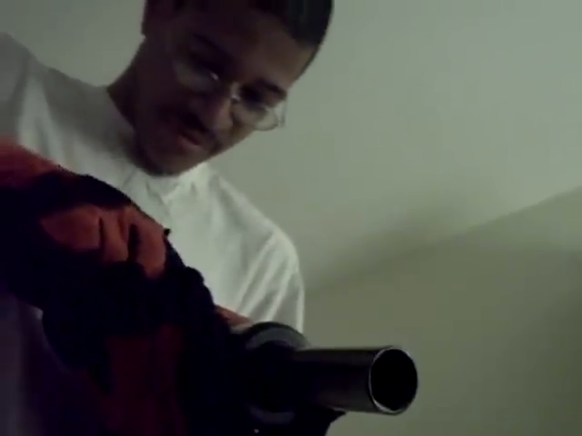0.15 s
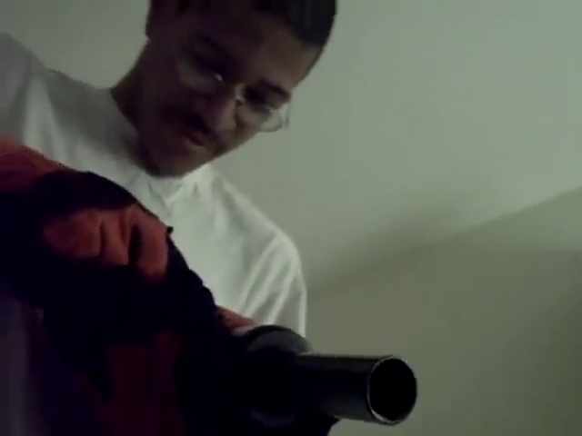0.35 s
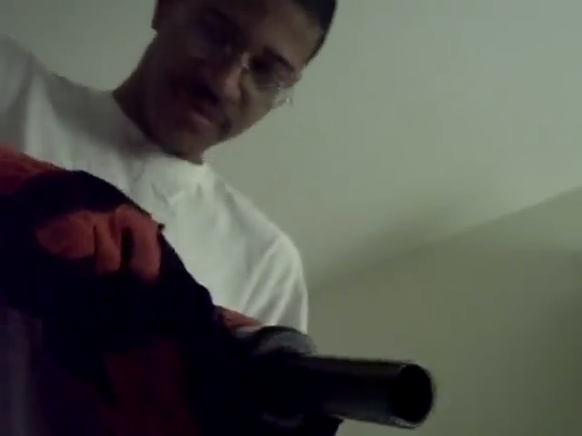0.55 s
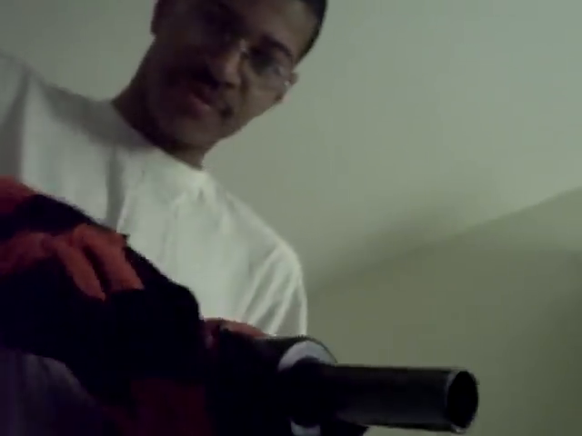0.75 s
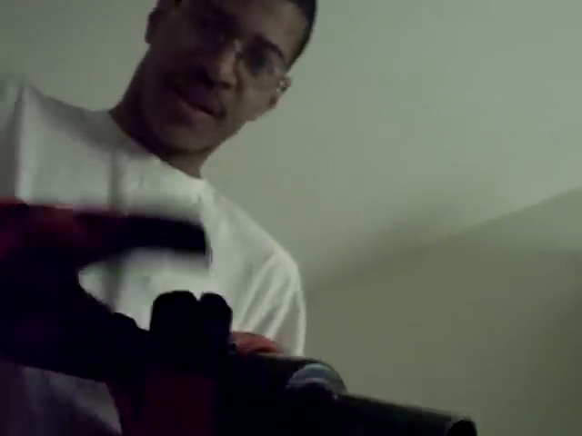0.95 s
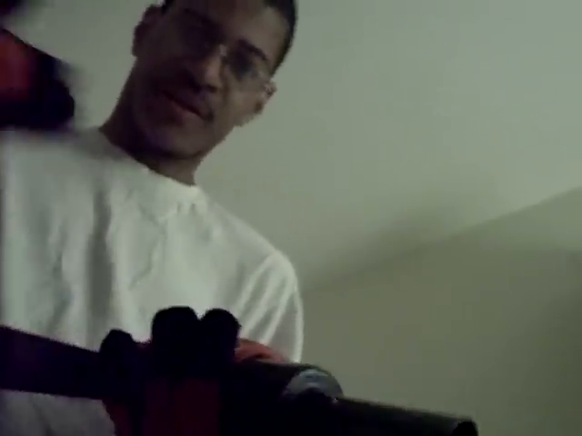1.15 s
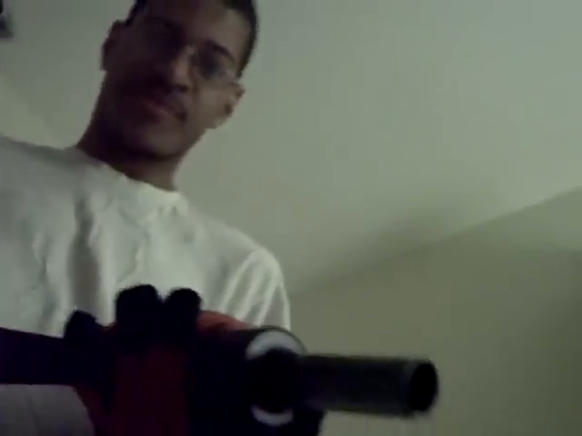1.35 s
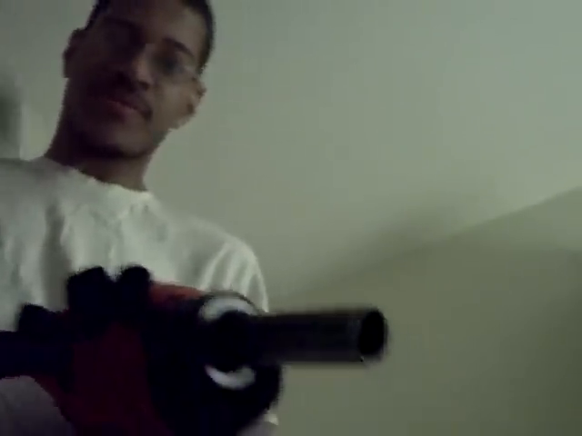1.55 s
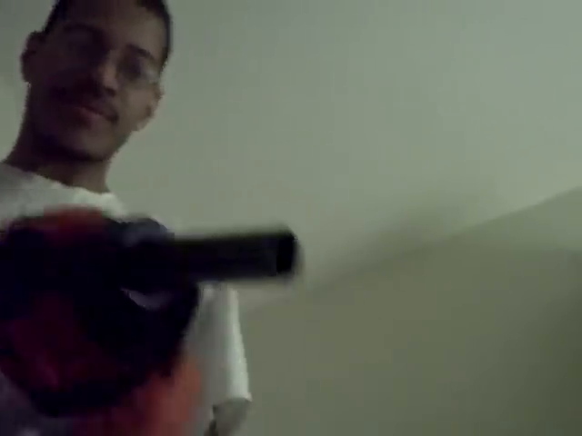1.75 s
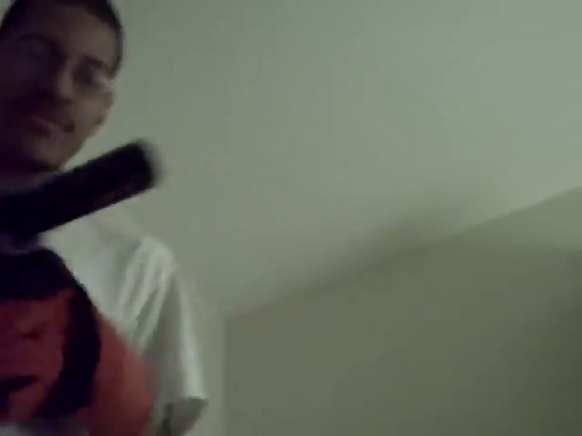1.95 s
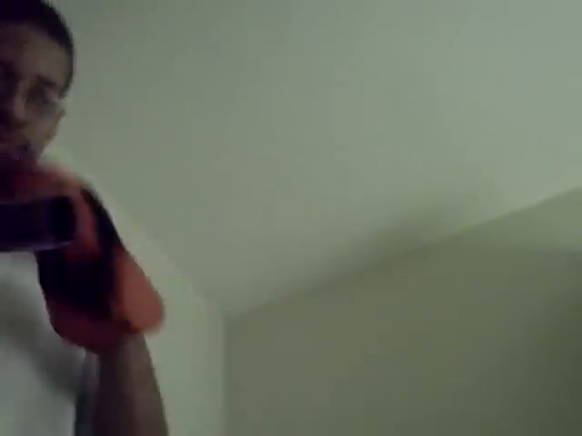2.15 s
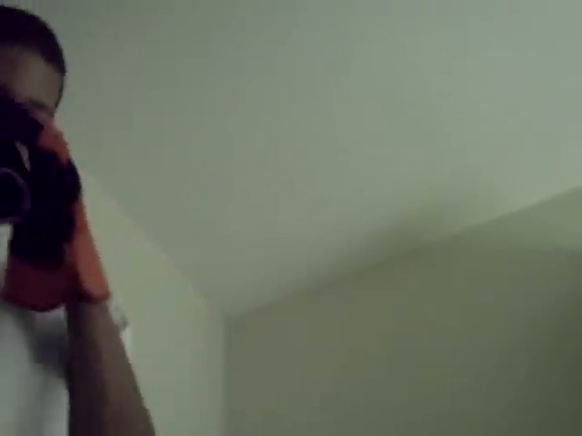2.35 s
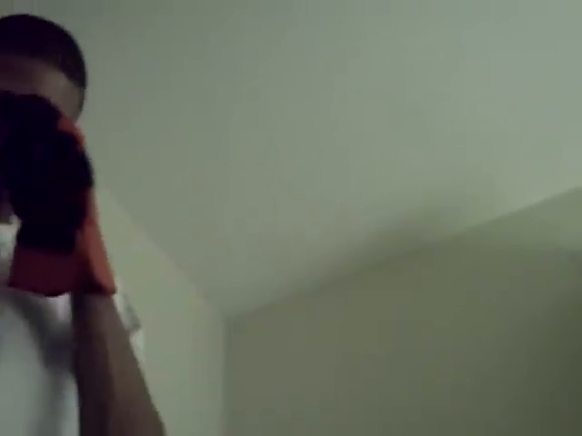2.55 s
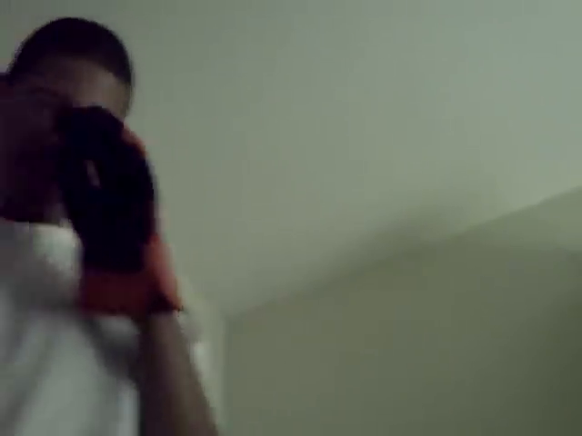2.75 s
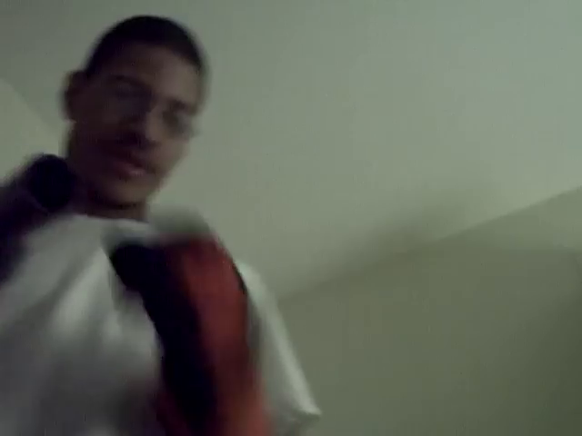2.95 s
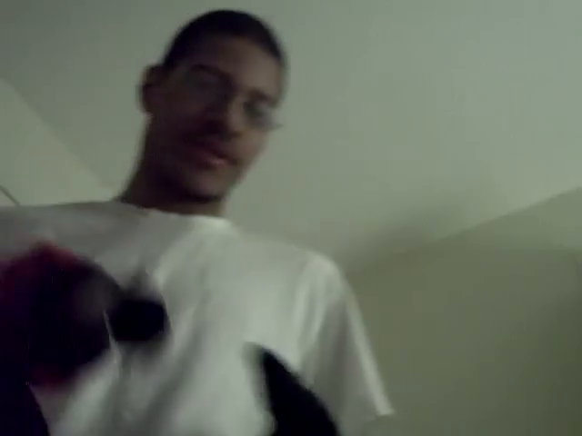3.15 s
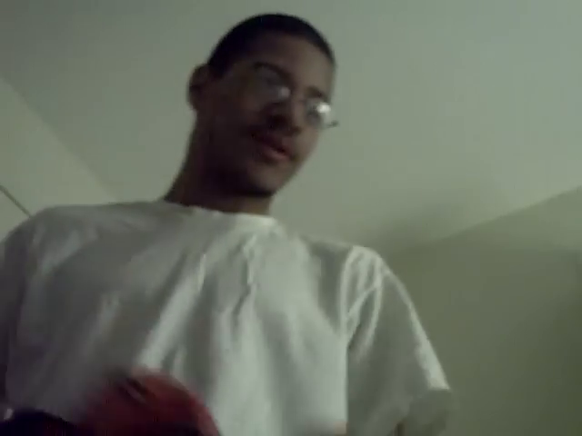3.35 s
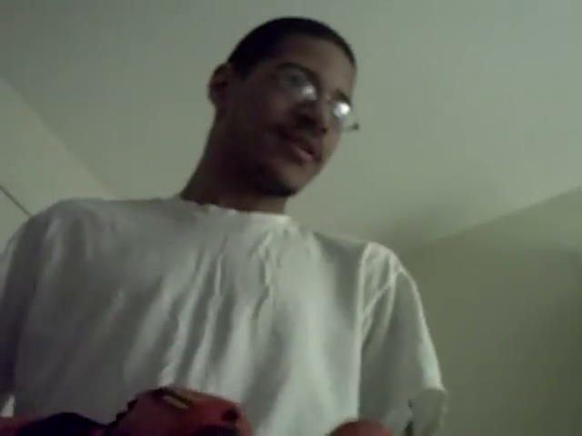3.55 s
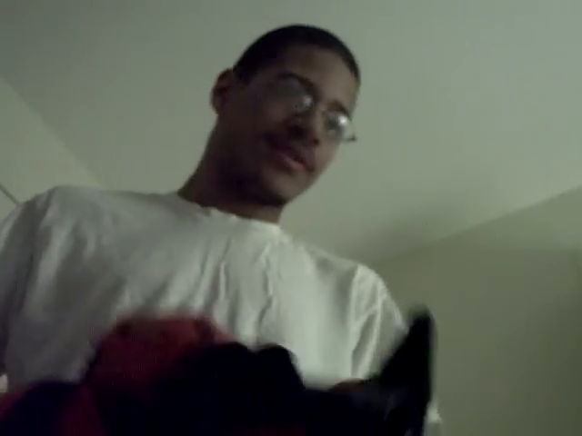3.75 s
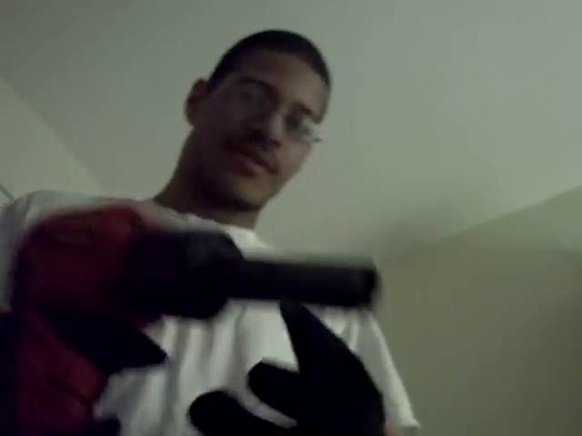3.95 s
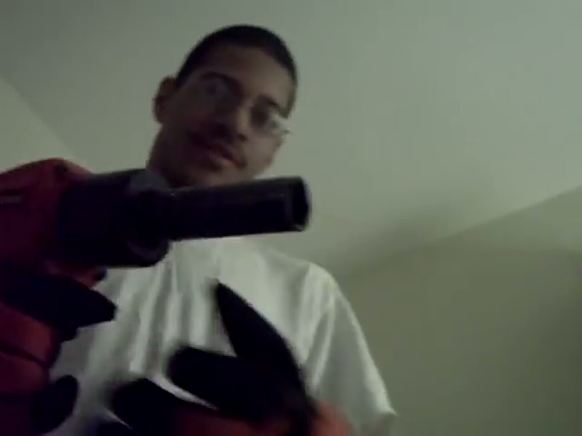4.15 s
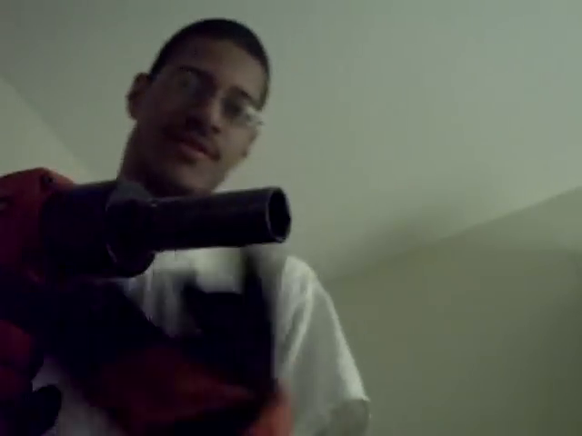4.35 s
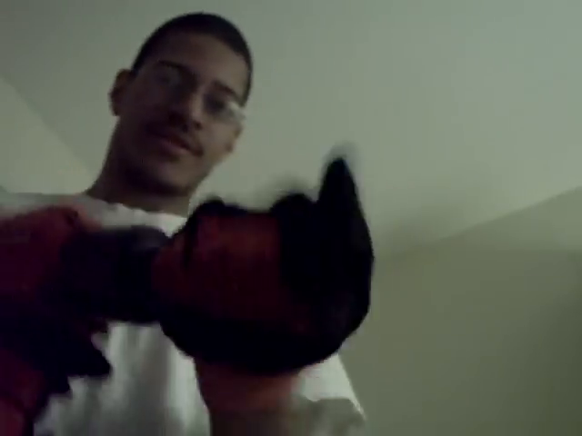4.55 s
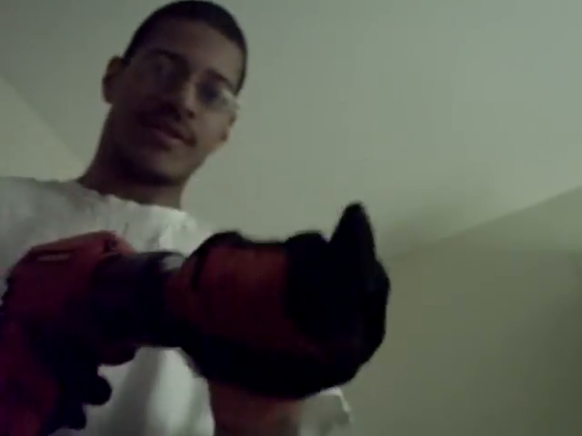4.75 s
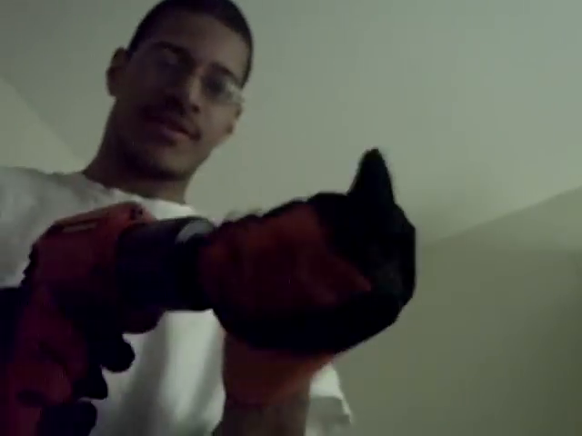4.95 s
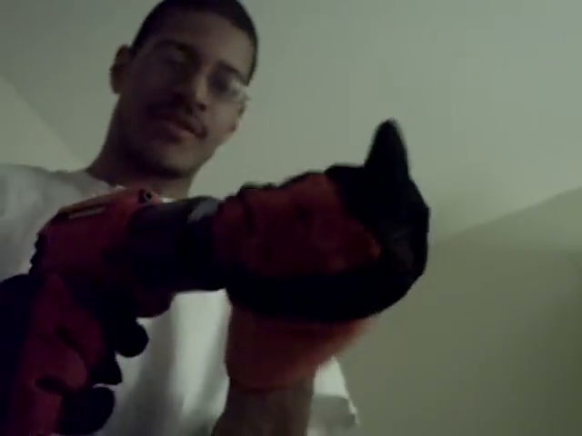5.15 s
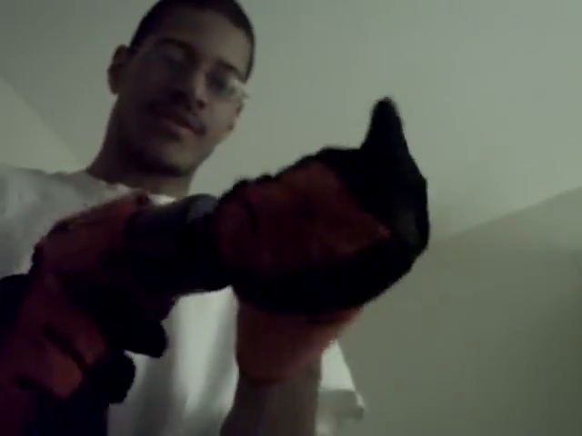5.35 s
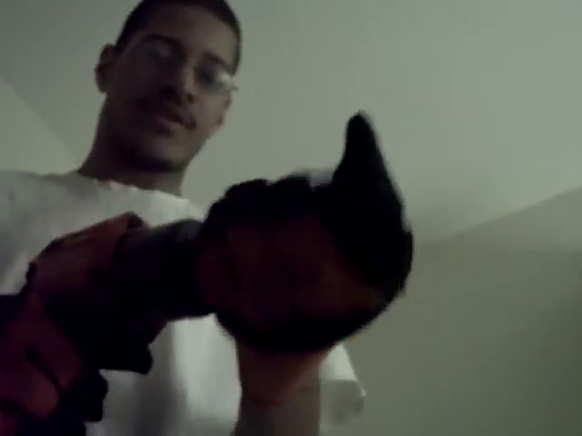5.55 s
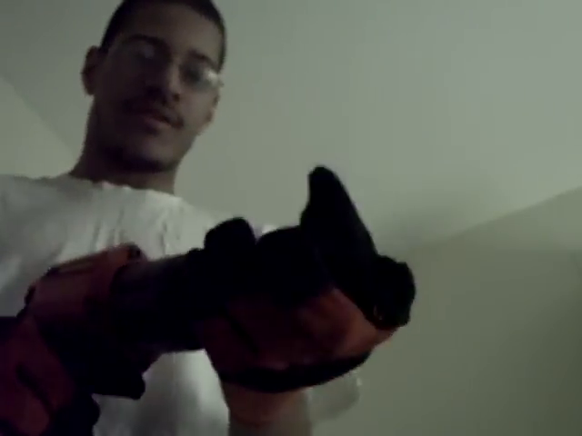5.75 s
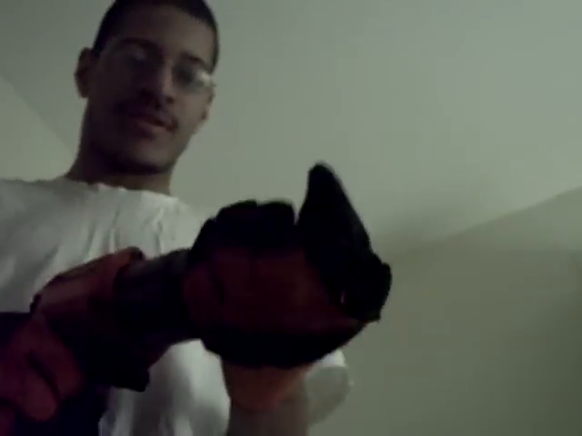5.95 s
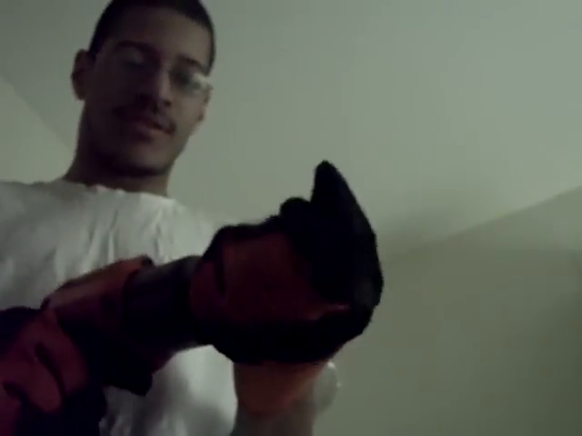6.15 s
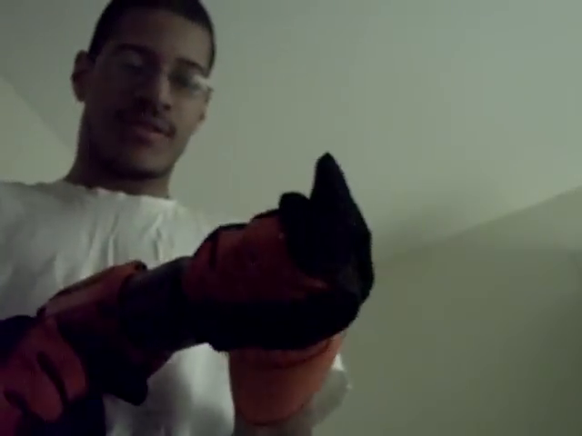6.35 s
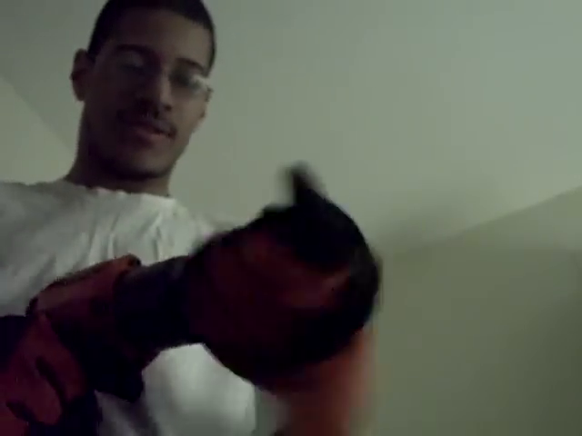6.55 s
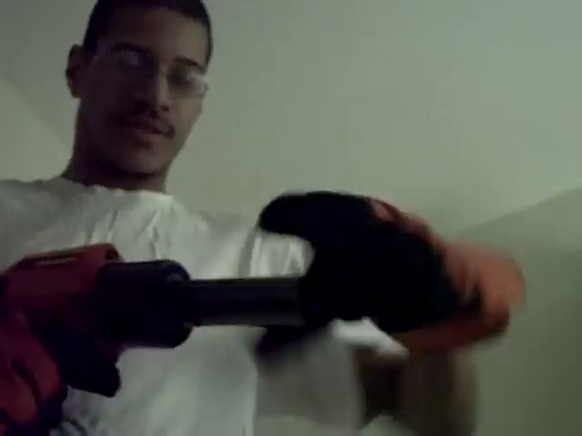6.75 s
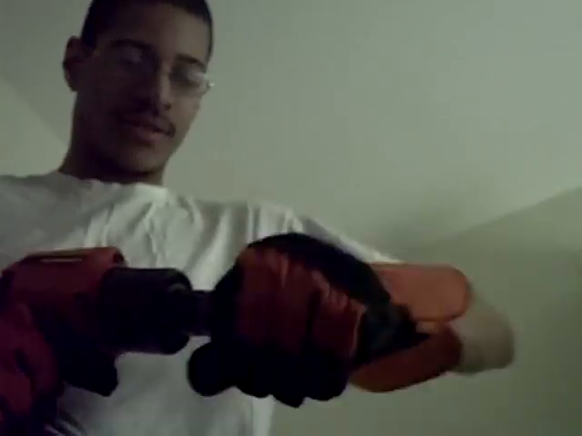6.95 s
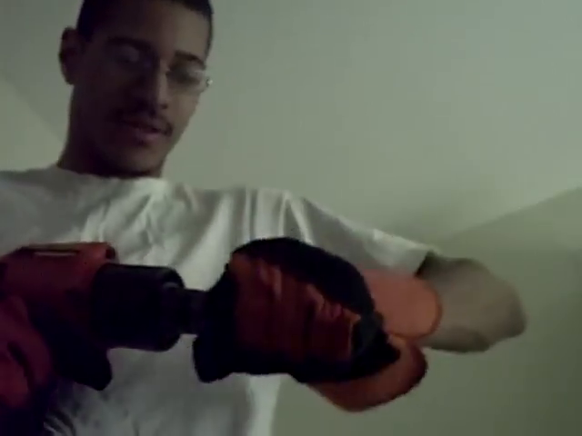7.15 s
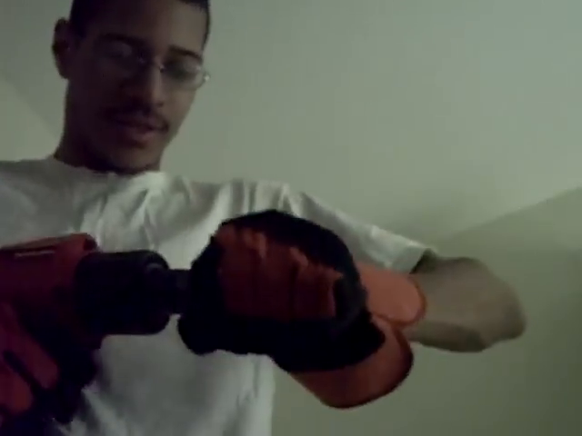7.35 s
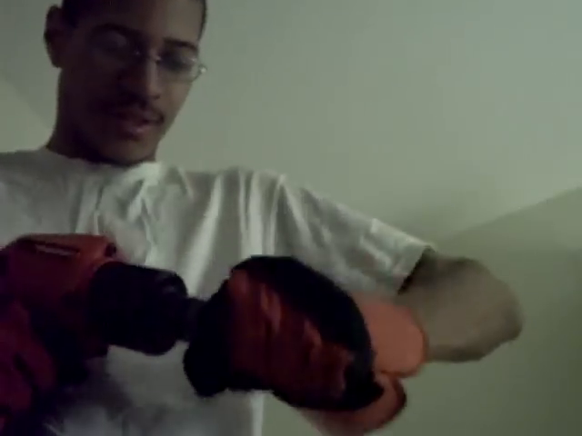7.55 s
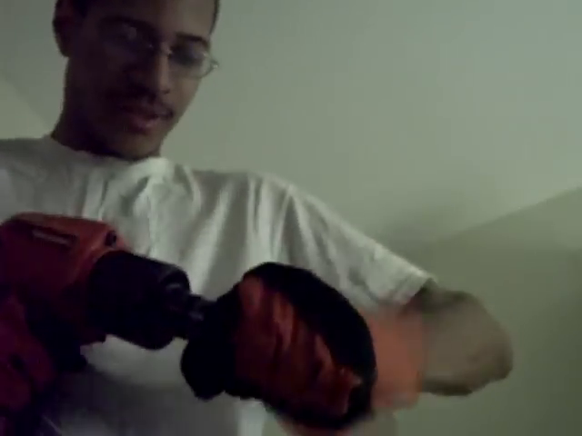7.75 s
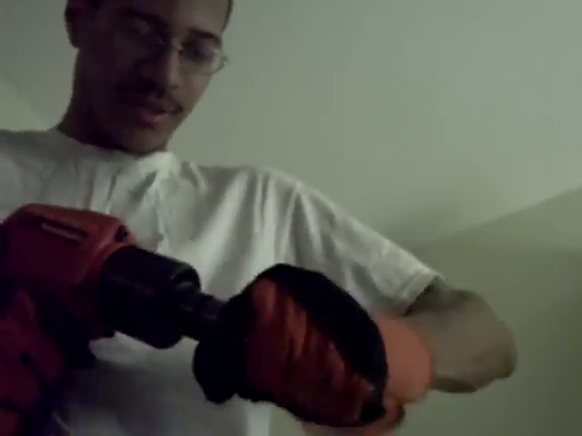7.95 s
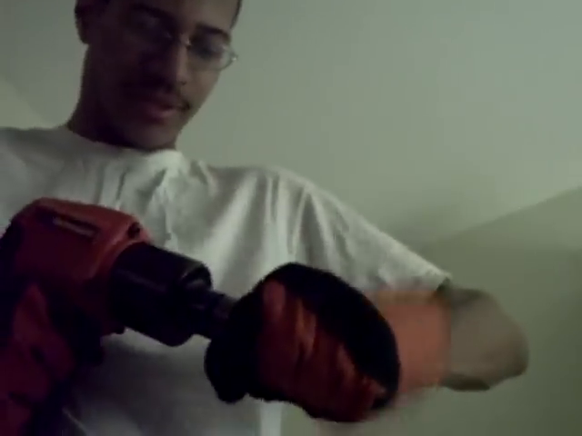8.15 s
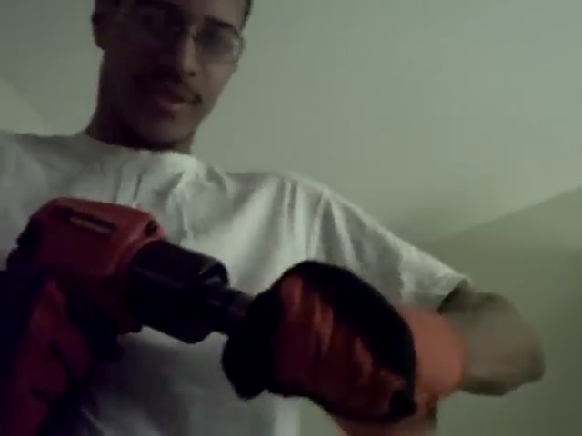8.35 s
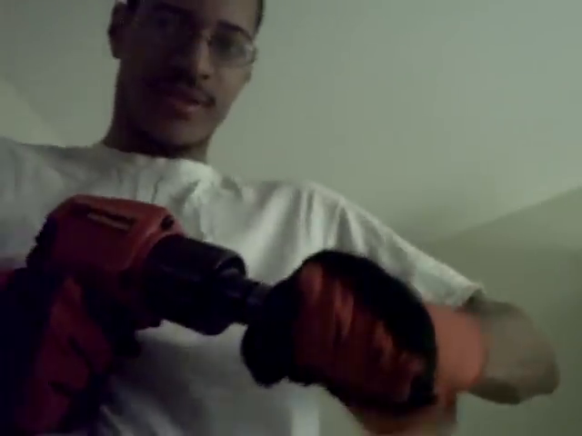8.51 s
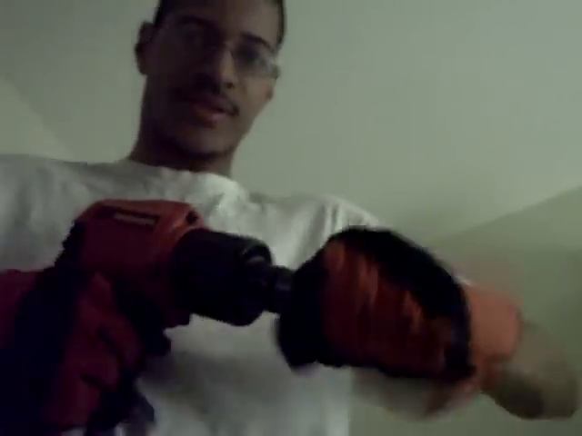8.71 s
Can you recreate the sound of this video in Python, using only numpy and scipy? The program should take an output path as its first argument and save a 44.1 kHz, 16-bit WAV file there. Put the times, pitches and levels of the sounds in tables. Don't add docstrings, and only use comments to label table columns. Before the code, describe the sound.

A steady compressor hum fills a bare room while an impact wrench close by hammers a short burst, pauses, then a longer one.

```python
import sys
import numpy as np
from scipy import signal
from scipy.fft import rfft, irfft
from scipy.io import wavfile
from scipy.ndimage import uniform_filter1d

SR = 44100
rng = np.random.default_rng(int(sys.argv[2]) if len(sys.argv) > 2 else 0)


def generate_wav(sig):
    pcm = np.round(np.clip(np.atleast_2d(sig).T, -1, 1) * 32767).astype(np.int16)
    wavfile.write(sys.argv[1], SR, pcm)


def gain_from_decibels(decibels):
    exponent = np.asarray(decibels, float) / 20
    return 10 ** exponent


N = 387191
PUMP_HZ = 56.378

# pressed t/s, let go t/s, hiss level/dB, grumble level/dB, shudder level/dB
TRIGGER_PULLS = [
    (4.793, 5.45, -30, -27, -22.5),
    (7.487, 8.9, -31, -15.5, -44),
]
# t/s, peak level/dB, housing clank level/dB
HAMMER_BLOWS = [(4.8519, -5.5, -10), (4.928, -8, -11), (4.9863, -10, -15), (5.0845, -7, -16),
                (5.1736, -10, -12.5), (5.2622, -14, -16), (5.353, -5, -18), (5.4477, -7, -15.5),
                (7.5429, 6, -6.5), (7.577, -5, -9), (7.6595, -3, -9), (7.742, -2.5, -12.5),
                (7.821, -4, -12), (7.8992, -9, -9.5), (7.979, -0.5, -5.5), (8.0596, 0.5, -8),
                (8.144, -9, -14), (8.227, -3, -10), (8.311, -4.5, -11), (8.395, -2, -12.5),
                (8.48, -2, -8.5), (8.5623, -3.5, -11), (8.643, 5, -10.5), (8.729, -3.5, -11.5)]
# t/s, peak level/dB, jolt of air level/dB
CAM_RELEASES = [(4.8219, -3, -6), (4.8988, -15, -25), (4.958, -9, -9), (5.0455, -6.5, -16),
                (5.141, -16, -25), (5.233, -16, -5), (5.3202, -4, 0.5), (5.3707, -14, -4),
                (5.4143, -15, -9), (7.522, -13, -23), (7.628, -8, -22), (7.7127, -10, -19),
                (7.793, -11, -11), (7.8709, -19, -8), (7.957, -14, -26), (8.0302, -18, -20),
                (8.114, -17, -22), (8.2055, -5.5, -13), (8.28, -14, -25), (8.37, -15, -25),
                (8.4494, -12.5, -25), (8.5334, -15, -3), (8.616, -11, -29), (8.7025, -20, -26)]


def level(x, db):
    return x * gain_from_decibels(db) / np.sqrt(np.mean(x ** 2))


def ring(x, modes):
    total = 0
    for k, (hz, width, db) in enumerate(modes):
        b, a = signal.iirpeak(hz, hz / width, SR)
        total = total + (-1) ** k * gain_from_decibels(db) * signal.lfilter(b, a, x)
    return total


def walk(rate):
    hold = int(SR / rate)
    steps = np.repeat(rng.standard_normal(N // hold + 1), hold)
    return 0.54 * uniform_filter1d(steps, hold)[:N]


def noise():
    return rng.standard_normal(N)


def bursts(times, gains, decay_s):
    kick = np.zeros(N)
    np.add.at(kick, (np.asarray(times) * SR).astype(int), gains)
    return signal.lfilter([1], [1, -np.exp(-1 / (decay_s * SR))], kick)


def swell(times, wide_s):
    kick = np.zeros(N)
    kick[np.minimum(np.asarray(times) * SR, N - 1).astype(int)] = 1
    return signal.fftconvolve(kick, np.hanning(int(wide_s * SR)), mode="same")


def exhaust(duty=0.32, fade_db=-48.0, scatter_db=3.0, quicken=1.2):
    # fastest puff t/s, its spacing/ms, vane passes since the stall, rebound level/dB
    spin_ups = [(4.8552, 4.46, 6.0, 0), (4.931, 4.4, 6.3, 0), (4.9856, 4.95, 6.2, 0), (5.084, 5.14, 5.8, 0),
                (5.1763, 4.87, 6.3, -8), (5.262, 5.11, 5.9, 0), (5.356, 5.32, 7.2, 0),
                (5.4375, 5.96, 5.1, -8), (7.5467, 4.59, 6.9, 0), (7.5792, 4.27, 9.0, 0),
                (7.6621, 4.71, 6.3, -8), (7.7468, 5.0, 7.4, -8), (7.8206, 4.75, 6.0, -8),
                (7.8983, 4.8, 5.4, 0), (7.9809, 4.78, 6.2, -8), (8.0646, 4.99, 7.2, -8),
                (8.142, 4.97, 6.2, -8), (8.2311, 5.09, 6.8, -8), (8.3096, 4.89, 5.8, 0),
                (8.3967, 5.19, 6.6, -8), (8.4843, 5.06, 7.0, -8), (8.5621, 4.88, 5.7, 0),
                (8.6409, 5.21, 5.3, -8), (8.7319, 4.59, 6.3, -8)]
    # f/Hz, width/Hz, level/dB
    muffler_modes = [(852, 400, -2.5), (1470, 1400, -10)]
    puff_db, loud_puffs = 4.5, 5
    rebound_ms, slower_ms_per_db = 6.7, .1
    puffs, gust = np.zeros(N + SR), np.zeros(N + SR)
    chance = rng.standard_normal((len(spin_ups), 12))
    for (end, gap, passes, back_db), luck in zip(spin_ups, chance):
        loud = min(loud_puffs, round(passes) - 1)
        back = rebound_ms - slower_ms_per_db * back_db
        j = np.arange(np.ceil(passes))
        speed = np.sqrt(1 - j / passes)
        times = end - 2 * passes * gap * (1 - speed) / 1000
        dbs = -8.0 * (j / passes) ** 2 + fade_db * (j > loud)
        coast = np.arange(1, 4)
        times = np.append(times, end + back / 1000 * np.cumsum(1.3 ** (coast - 1)))
        dbs = np.append(dbs, back_db + 6.0 - 9.5 * coast)
        speed = np.append(speed, gap / back / 1.49 ** coast)
        for when, db, v, r in zip(times, dbs, np.maximum(speed, .78), luck):
            size = int(duty * gap / 1000 / v * SR * (1 + 0.11 * np.tanh(r)))
            i = int(when * SR - .78 * size)
            gain = gain_from_decibels(puff_db + db + scatter_db * r)
            puffs[i:i + size] += gain * np.sin(2 * np.pi * (np.arange(size) / size) ** quicken)
            gust[i:i + 2 * size] += gain * np.hanning(2 * size)
    jet = gust[:N] * ring(noise(), [(2500, 2500, -15.5), (9400, 2100, -13.0)])
    return puffs[:N] + ring(puffs[:N], muffler_modes) + jet


def hammer():
    # f/Hz, width/Hz, level/dB
    steel_modes = [(7000, 2700, -12), (7670, 300, -4), (9200, 1500, 0.5), (10000, 2200, -4.5)]
    # f/Hz, width/Hz, level/dB
    housing_modes = [(1010, 177, 7.5), (1676, 275, 2), (2370, 470, -6.5), (2860, 270, 0.5)]
    pull_anvil_db = [-22.5, -28.5]
    valve_lag_s = .019
    trigger_db, valve_click_db = -26, -12
    settle_s, settle_db = .034, -27.5
    cam_clank_db, cam_anvil_db, blow_jolt_db = -18.5, 1, -18
    tick_clank_db, tick_re_db = -5, -19.5

    blow_s, blow_db, blow_clank_db = np.transpose(HAMMER_BLOWS)
    cam_s, cam_db, cam_jolt_db = np.transpose(CAM_RELEASES)
    press_s = np.array(TRIGGER_PULLS)[:, 0]
    click_s = press_s + valve_lag_s

    def held_db(s):
        return np.take(pull_anvil_db, np.searchsorted(press_s, s) - 1)

    drop_db = settle_db + 3.0 * rng.standard_normal(len(blow_s))
    tick_s = np.r_[press_s, click_s, blow_s + settle_s]
    tick_db = np.r_[trigger_db + 0 * press_s, valve_click_db + 0 * press_s, drop_db]
    s = np.r_[blow_s, cam_s, tick_s]
    crack_db = np.r_[blow_db, cam_db, tick_db]
    clank_db = np.r_[blow_clank_db, cam_clank_db + 0 * cam_s, tick_db + tick_clank_db]
    anvil_db = np.r_[held_db(blow_s), held_db(cam_s) + cam_anvil_db, tick_db + tick_re_db]
    jolt_db = np.r_[blow_jolt_db + 0 * blow_s, cam_jolt_db, tick_db + tick_re_db]
    valve = np.isin(s, click_s)
    jolt_db[valve], clank_db[valve], anvil_db[valve] = -6.5, -22, -22

    def shake(db, fast_s, slow_s):
        return (bursts(s, gain_from_decibels(db), fast_s) + 0.065 * bursts(s, gain_from_decibels(db), slow_s)) * noise()

    steel = ring(shake(crack_db + 10.5, 0.0021, 0.024), steel_modes)
    clank = ring(shake(clank_db + 15.5, 0.0042, 0.048), housing_modes)
    anvil = ring(shake(anvil_db + 16.5, 0.0031, 0.027), [(4510, 620, 3.5), (5000, 900, 1.0)])
    jolt = ring(bursts(s, gain_from_decibels(jolt_db + 17.5), 0.00067), [(258, 94, 0)])
    return steel + clank + anvil + jolt


def air():
    open_s, close_s, shut_db = 0.01, 0.086, -15
    blow_swell_db, blow_lag_s, blow_wide_s = [4.5, -5, -10], 0.014, 0.082
    cam_swell_db, cam_lag_s, cam_wide_s = [0.5, -2.5, 5.5], -0.004, 0.026

    t = np.arange(N) / SR
    held_db = np.full((3, N), -99.)
    for press, go, *dbs in TRIGGER_PULLS:
        held = (t >= press - open_s) & (t <= go + close_s)
        turns_s = [press - open_s, press + open_s, go, go + close_s]
        valve_db = np.interp(t[held], turns_s, [2 * shut_db, 0, 0, shut_db])
        held_db[:, held] = np.add.outer(dbs, valve_db)
    blow_s = np.array(HAMMER_BLOWS)[:, 0]
    cam_s = np.array(CAM_RELEASES)[:, 0]
    held_db += np.outer(blow_swell_db, swell(blow_s + blow_lag_s, blow_wide_s))
    held_db += np.outer(cam_swell_db, swell(cam_s + cam_lag_s, cam_wide_s))
    hiss = level(ring(noise(), [(2540, 2000, 1.45), (5100, 1100, 1), (8800, 3000, 1.2)]), 0)
    grumble = level(ring(noise(), [(278, 720, 1.5), (784, 1080, 3.5), (1530, 1360, -8.5)]), 0)
    shudder = level(ring(ring(noise(), [(130, 160, 0)]), [(150, 160, 0)]), 0)
    flicker_db = np.array([8.8 * walk(150), 0.53 * walk(83), 2.1 * walk(30)])
    return np.sum(gain_from_decibels(held_db + flicker_db) * [hiss, grumble, shudder], axis=0)


def whistle():
    pull_whistle_db = [-30.5, -36]
    early_s, fade_db_per_s = 0.025, -14
    t = np.arange(N) / SR
    flow = np.zeros(N)
    for (press, go, *_), db in zip(TRIGGER_PULLS, pull_whistle_db):
        opening = np.interp(t, [press - early_s, press + .005, go, go + .06], [0, 1, 1, 0])
        flow += opening * gain_from_decibels(db + fade_db_per_s * (t - press))
    seat = [(4980, 500, 0)]  # f/Hz, width/Hz, level/dB
    tone = level(ring(ring(noise(), seat), seat), 0)
    return flow * gain_from_decibels(4.0 * walk(25)) * tone


def strokes(multiples, sizes, start):
    bins = np.zeros(8193, complex)
    bins[multiples] = sizes * np.exp(1j * start[multiples])
    cycle = irfft(bins) * 2 ** .5 * (len(bins) - 1)
    phase = np.arange(N) * PUMP_HZ / SR % 1
    return np.interp(phase, np.arange(len(cycle)) / len(cycle), cycle, period=1)


def stroke_drone(near, gain, start):
    # multiple of the stroke rate, level/dB
    bent = [(1, -10), (2, -17), (3, -15), (4, -5), (5, -7), (6, -11.5), (7, 0.5), (8, -12.5), (9, -10.5),
            (10, -16), (11, -9.5), (12, -26), (13, -3.5), (14, -27), (15, -11), (16, -4.5), (17, -10.5),
            (18, -21), (19, -2), (20, -14), (21, -15), (22, -9), (23, -35), (24, -52), (25, -61),
            (26, -12.5), (27, -19), (28, -29), (29, -20.5), (30, -24)]
    # multiple of the stroke rate, level/dB
    aside = [(1, -14), (2, -23), (3, -20), (4, -10), (5, -10.5), (6, -13), (7, 1), (8, -10.5), (9, -4),
             (10, -25), (11, -24), (12, -10), (13, -9), (14, -10), (15, -19.5), (16, -4), (17, -18.5),
             (18, -43), (19, -4.5), (20, -36), (21, -35), (22, -13), (23, -38.5), (24, -34), (25, -56),
             (26, -16), (27, -25), (28, -23.5), (29, -25), (30, -26)]
    # multiple of the stroke rate, level/dB
    upright = [(1, -12.5), (2, -20.5), (3, -17), (4, -8), (5, -10), (6, -14), (7, 0), (8, -16), (9, -9),
               (10, -19), (11, -22), (12, -16), (13, -8), (14, -31), (15, -12), (16, -14), (17, -10.5),
               (18, -54.5), (19, -6), (20, -16), (21, -28), (22, -53), (23, -24), (24, -26), (25, -68),
               (26, -14), (27, -23), (28, -35), (29, -22), (30, -32)]
    k, db = np.transpose(upright[:4])
    drone = strokes(np.round(k).astype(int), gain_from_decibels(db - 23), start)
    for weight, spot in zip(near, (bent, aside, upright)):
        k, db = np.transpose(spot[4:])
        drone += gain * weight * strokes(np.round(k).astype(int), gain_from_decibels(db), start)
    return drone


def valve_clatter(near, start):
    # f/Hz, width/Hz, level/dB
    plate_modes = [(1780, 220, 10), (2860, 250, 5), (3680, 510, 3), (4430, 320, 6), (5400, 1100, 0.5),
                   (7140, 620, 5), (9060, 195, 11.5)]
    # t/s, level/dB
    reed_whine = [(0, -61), (2.6, -53), (3.0, -51.5), (3.5, -46), (4.6, -47.5), (5.7, -46), (6.8, -48),
                  (7.2, -46), (8.78, -69)]
    k = np.arange(31, 200)
    uneven = gain_from_decibels(4.5 * rng.standard_normal((3, len(k))))
    taps = sum(weight * strokes(k, sizes, start) for weight, sizes in zip(near, uneven))
    clatter = level(ring(taps, plate_modes), -41)
    whine_s, whine_db = np.transpose(reed_whine)
    clatter += gain_from_decibels(np.interp(np.arange(N) / SR, whine_s, whine_db)) * strokes(48, 1, start)
    return clatter * gain_from_decibels(0.2 * walk(2.1))


def compressor_rush(gain):
    # f/Hz, level/dB per Hz
    rush_spectrum = [(30, -22), (100, -12), (400, -3.5), (700, -1), (1200, -3), (1500, -3), (2100, -13.5),
                     (3000, -17), (5900, -20), (8000, -14.5), (10000, -13.5), (12500, -30)]
    # f/Hz, width/Hz, level/dB
    tank_modes = [(479.8, 22.5, -33.5), (745, 34, -37.5), (772.6, 26, -37), (826, 30, -39.5),
                  (866, 38, -43), (933, 35, -47), (1036, 54, -41), (2840, 360, -52), (3667, 110, -52.5),
                  (4550, 100, -57), (8960, 470, -43)]
    hz, db = np.transpose(rush_spectrum)
    f = np.maximum(np.fft.rfftfreq(N, 1 / SR), 1)
    rush = irfft(rfft(noise()) * gain_from_decibels(np.interp(np.log(f), np.log(hz), db)), N)
    turn = 2 * np.pi * PUMP_HZ * np.arange(N) / SR
    throb = gain_from_decibels(0.4 * np.sin(turn) + 0.27 * np.sin(3 * turn + 0.88) + 1.5 * walk(7.8))
    tank = np.zeros(N)
    for hz, width, db in tank_modes:
        mode = [(hz, width, 0)]
        tank += level(ring(ring(noise(), mode), mode), db) * gain_from_decibels(walk(3.98))
    return throb * (level(rush, -32) + tank * (gain / gain.max()) ** 0.09)


def compressor():
    # t/s, place (0 bent, 1 aside, 2 upright), drone level/dB above the fourth multiple
    body_stance = [(0, 0.01, -25.5), (.9, 0.01, -25), (1.4, 0.16, -26), (1.75, 0.41, -25), (2.2, 0.71, -22),
                   (2.8, 1.2, -20.5), (3.1, 1.38, -21), (3.5, 1.55, -20), (4.3, 1.57, -20.5),
                   (4.7, 1.74, -21), (5.5, 3.3, -21.5), (7.0, 3.5, -20.5), (8.78, 1.94, -24)]
    t = np.arange(N) / SR
    s, place, drone_db = np.transpose(body_stance)
    place = np.interp(t, s, np.clip(place, 0, 2))
    gain = gain_from_decibels(np.interp(t, s, drone_db))
    near = [np.maximum(1 - abs(place - spot), 0) for spot in range(3)]
    bend = np.arange(200) - 3.8
    start = np.cumsum(np.cumsum(np.roll(.38 * bend * abs(bend), 1)))
    return stroke_drone(near, gain, start) + valve_clatter(near, start) + compressor_rush(gain)


def bump():
    bump_s, bump_hz, bump_db = 1.925, 26, -41
    t = np.arange(N) / SR - bump_s
    return gain_from_decibels(bump_db) * np.sin(2 * np.pi * bump_hz * t) * (t > 0) * (t < 1 / bump_hz)


def room(x, t60=0.089, wet_db=-26.0):
    t = np.arange(SR // 2) / SR
    tail = rng.standard_normal(len(t)) * np.exp(-np.log(1000) * t / t60) * (t > .004)
    tail = signal.lfilter([1], [1, -.6], tail)
    return x + signal.fftconvolve(x, gain_from_decibels(wet_db) * tail / np.sqrt(np.sum(tail ** 2)))[:N]


def scene():
    no_bass = signal.butter(2, 215, "high", fs=SR, output="sos")
    tool = signal.sosfilt(no_bass, exhaust()) + hammer() + air() + whistle()
    return (room(tool) + compressor() + bump())[None]


def roll_off(x):
    return signal.sosfilt(signal.butter(12, 16830, fs=SR, output="sos"), x)


def record(dry):
    ceiling = .715
    clipped = np.clip(dry, -ceiling, ceiling)
    dull = signal.sosfilt(signal.butter(5, 10300, fs=SR, output="sos"), clipped)
    cut = signal.sosfilt(signal.ellip(12, .5, 80, 12300, fs=SR, output="sos"), dull)
    again = np.clip(cut, -1.025 * ceiling, 1.025 * ceiling)
    mix = signal.sosfilt(signal.ellip(8, .3, 50, 15900, fs=SR, output="sos"), again)
    return roll_off(mix)


dry = scene()
out = record(dry)
generate_wav(out)
```